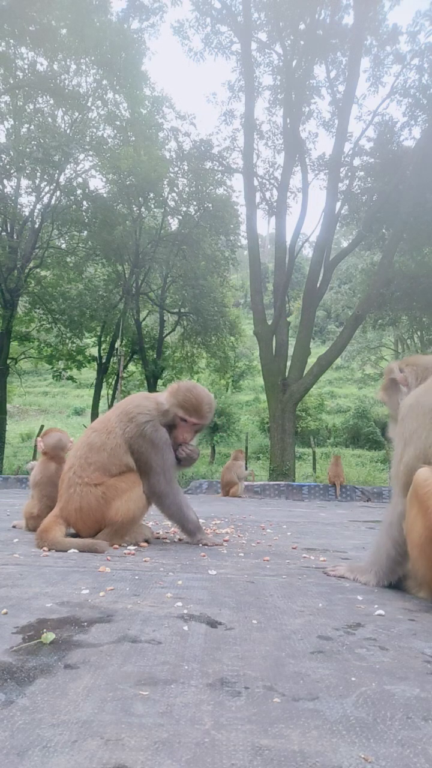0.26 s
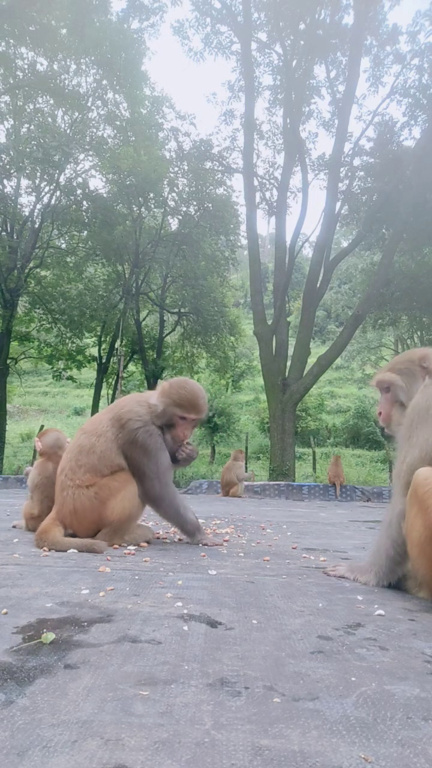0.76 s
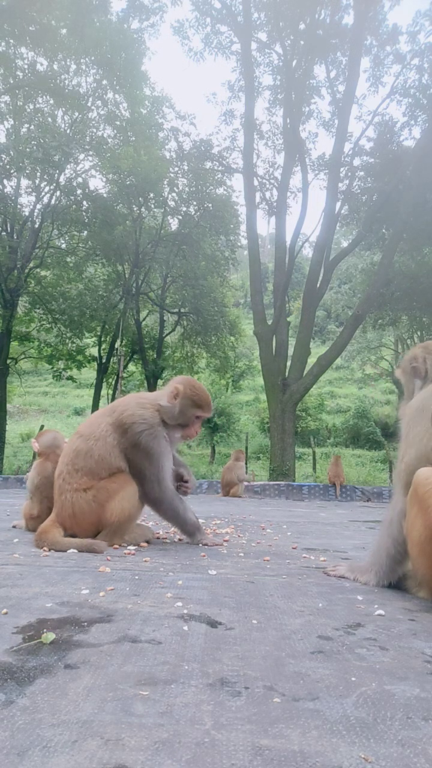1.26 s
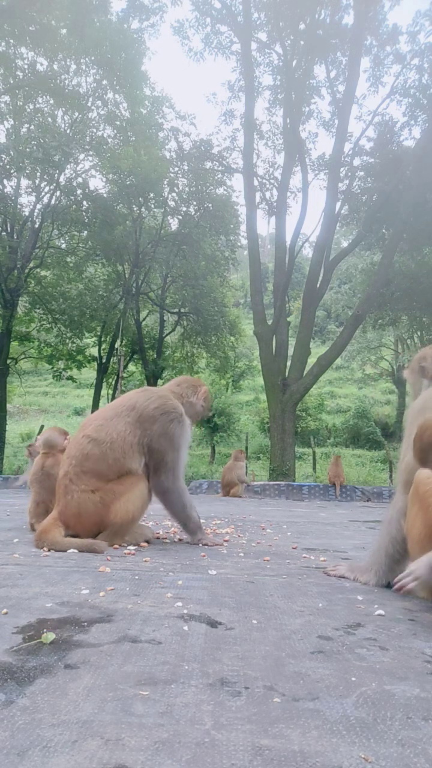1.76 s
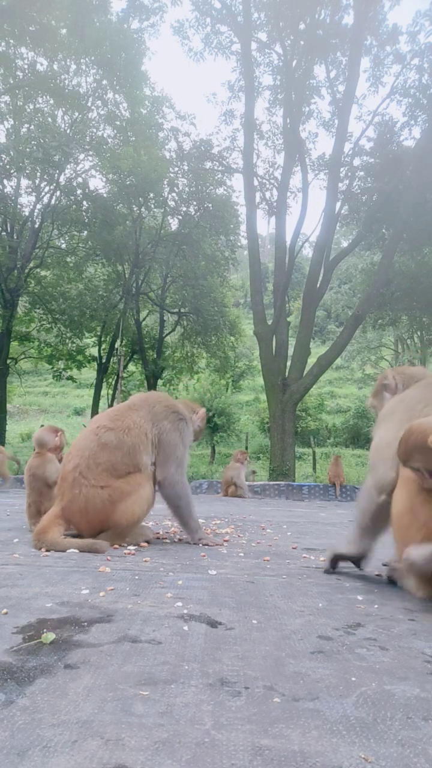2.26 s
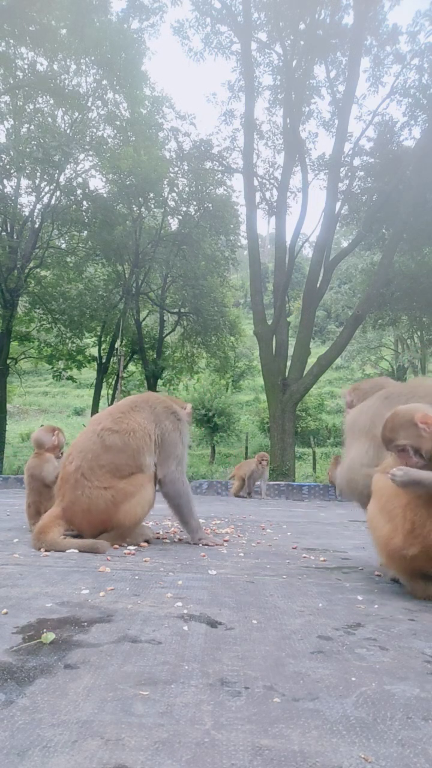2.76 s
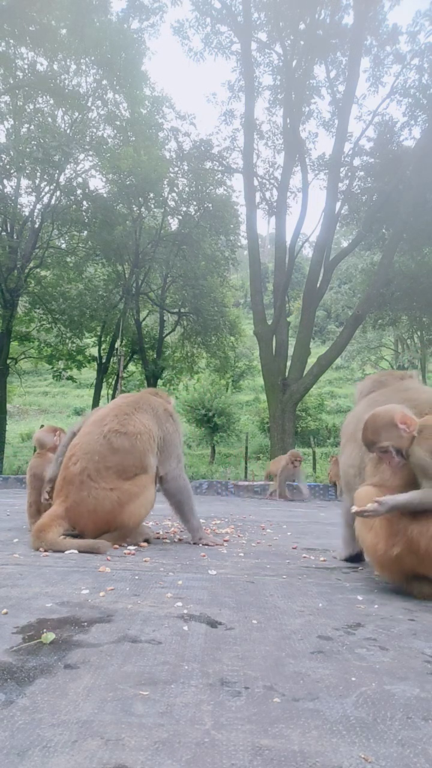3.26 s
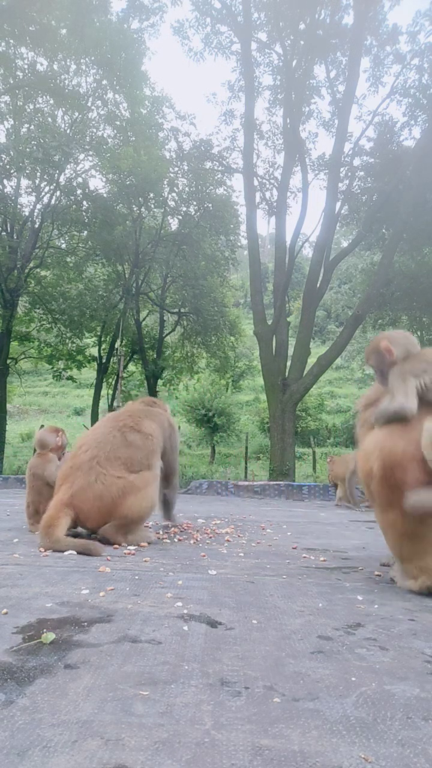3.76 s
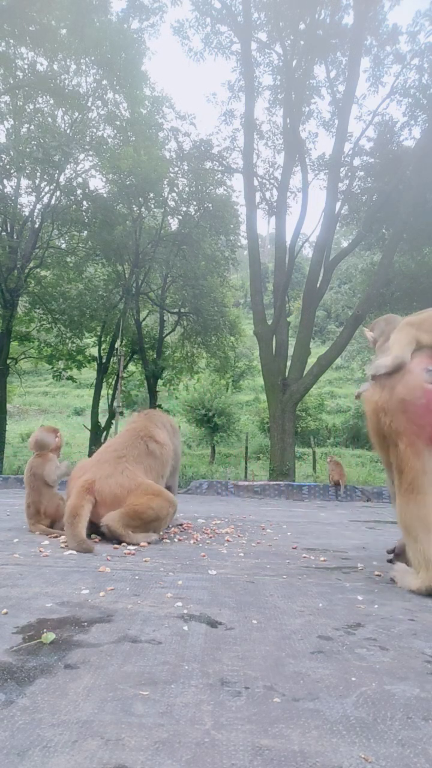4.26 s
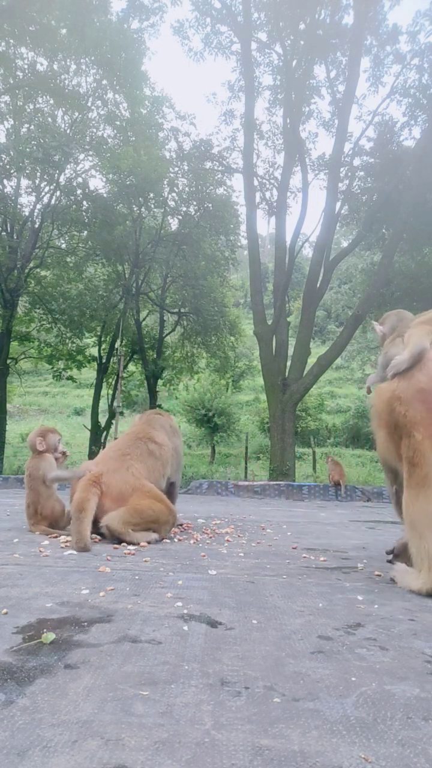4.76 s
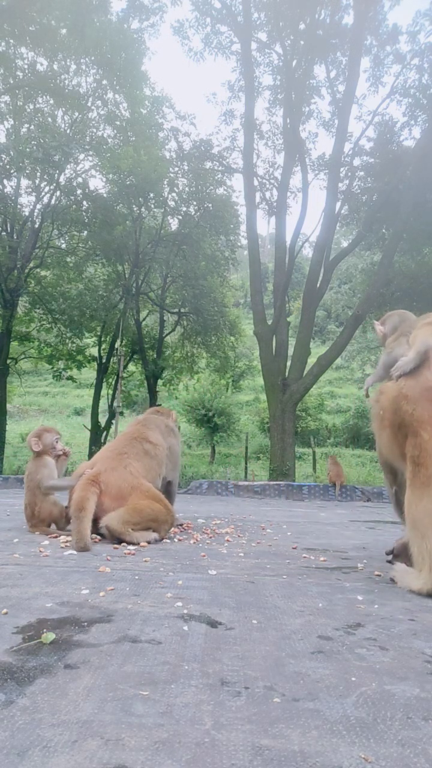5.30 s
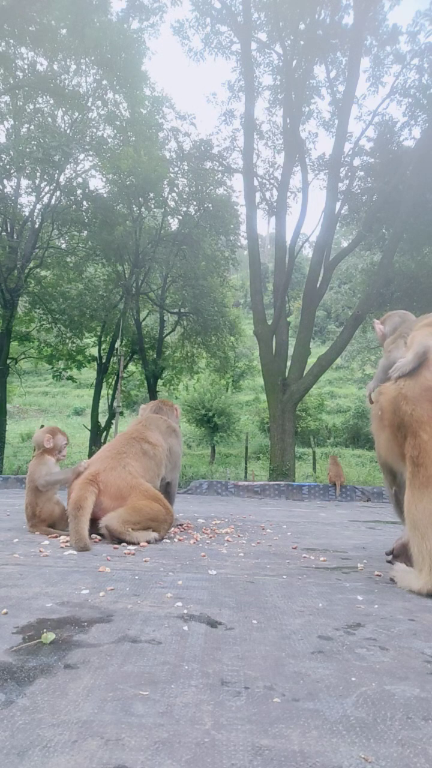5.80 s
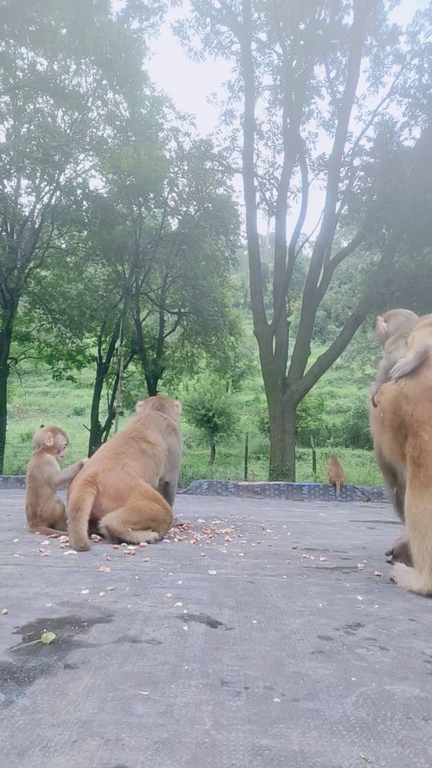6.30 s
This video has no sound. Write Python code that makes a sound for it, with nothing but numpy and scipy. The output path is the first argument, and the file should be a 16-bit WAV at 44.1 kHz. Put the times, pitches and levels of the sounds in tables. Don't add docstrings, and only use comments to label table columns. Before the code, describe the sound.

In an open wood by day, a monkey some way off hoots hoarsely, each call about 0.2 seconds, arching up to a middling pitch and sinking, with breathy rasp and soft echoes from trunks. The tail of one hoot opens the scene; a bout runs 0.4 to 1.6 seconds, another 2.2 to 3.4, a third 4.0 to 5.2, and two higher hoots come at 6.2 and 6.5. Clear coos glide quietly around 1.3 and 1.8 to 2.5. A young monkey, left of centre, squeaks sharply near 3.3 to 3.9, with a fast cluster at 3.5, and again 5.0 to 6.5, amid thin wheezes. Rough grunts come at 5.6, snorts at 6.5. Small bright ticks of nuts and grit scatter close at left; faint trilled birds whistle far away. A steady cicada whine around six to seven kilohertz and low leafy hush continue throughout.

```python
import sys
import numpy as np
from scipy import signal
from scipy.fft import rfft, irfft
from scipy.io import wavfile
from scipy.ndimage import uniform_filter1d

SR = 44100
rng = np.random.default_rng(int(sys.argv[2]) if len(sys.argv) > 2 else 0)


def dump(signal):
    limited = np.clip(np.atleast_2d(signal).T, -1, 1)
    pcm = np.round(limited * 32767).astype(np.int16)
    wavfile.write(sys.argv[1], SR, pcm)


def convert_level_to_amplitude(level_db):
    exponent = np.asarray(level_db, float) / 20
    return 10 ** exponent


N = 288414


def evened(x):
    return x / np.sqrt(np.mean(x ** 2) + 1e-20)


def read(points, hz):
    f, value = np.transpose(points)
    return np.interp(np.log(hz + 1), np.log(f + 1), value)


def coloured(x, points):
    size = x.shape[-1]
    return irfft(rfft(x) * convert_level_to_amplitude(read(points, np.fft.rfftfreq(size, 1 / SR))), size)


def played(rows):
    s, *columns = np.transpose(rows)
    t = np.arange(max(s[0], 0), s[-1], 1 / SR)
    return [t] + [np.interp(t, s, c) for c in columns]


def add(mix, s, sound):
    part = mix[..., max(round(s * SR), 0):][..., :sound.shape[-1]]
    part += sound[..., :part.shape[-1]]


def resonate(x, hz, width):
    turn = np.exp(2j * np.pi * np.cumsum(hz * np.ones(x.shape[-1])) / SR)
    r = np.exp(-np.pi * width / SR)
    return 2 * (turn * signal.lfilter([1 - r], [1, -r], x / turn + 1e-18)).real


def resonate_twice(x, hz, width, second_width):
    return resonate(resonate(x, hz, width), hz, second_width)


def drift(size, hz):
    span = max(int(SR / hz / 2), 1)
    return evened(uniform_filter1d(uniform_filter1d(rng.standard_normal(size), span), span))


def panned(x, db):
    return x * convert_level_to_amplitude(np.array([[db / 2], [-db / 2]]))


# (start [s], length [s], effort [dB], top pitch [Hz], throat re effort at mid call [dB])
HOOTS = [(-0.19, 0.21, -27, 565, -1), (0.369, 0.17, -23.5, 563, -1), (0.57, 0.2, -24, 556.6, -2.5),
         (0.791, .21, -25.5, 536.8, -2.5), (1.016, 0.2, -26, 542.7, 2), (1.235, 0.17, -25, 556.2, 0.5),
         (1.451, 0.18, -26.5, 567.7, 2), (2.192, 0.18, -24, 556.6, -1.5), (2.398, 0.18, -24, 575, -2.5),
         (2.61, .2, -24, 562.6, -4.5), (2.811, 0.21, -25.5, 546, -4.5), (3.019, .195, -24, 538.4, -2.5),
         (3.221, 0.19, -27.5, 577, 1), (4.045, .185, -25.5, 582, 0), (4.312, 0.17, -26, 588, 0.5),
         (4.534, .165, -25.5, 584, 0), (4.761, 0.17, -25.5, 573.6, 1), (5.02, 0.17, -28, 590.5, 3),
         (6.223, 0.15, -25.5, 619.5, 4), (6.489, 0.15, -22.5, 651, -7.5)]
# (frequency [Hz], level [dB per Hz])
BREATH = [(88, -70), (150, -38.5), (349, -3), (519, 12), (637, 2), (948, -19), (1190, -7.5), (1540, -46.5),
          (3200, -67), (4160, -77), (7040, -120)]
# (time [s], throat resonance [Hz], mouth resonance [Hz])
JAW = [(0, 920, 1507), (0.45, 890, 1415), (0.9, 894, 1453), (1.1, 919, 1490), (1.55, 905, 1535),
       (2.3, 938, 1490), (2.7, 891, 1487), (3.3, 922, 1542), (4.1, 1001, 1690), (4.6, 925, 1600),
       (4.85, 957, 1603), (5.1, 1023, 1760), (6.3, 983, 1590), (6.5, 1090, 1700)]


def hoot(s, length, effort_db, top_hz, open_db):
    length = length + 0.02
    t = np.arange(0, length, 1 / SR)
    u = t / length
    jaw_s, throat_curve, mouth_curve = np.transpose(JAW)
    throat_hz = np.interp(s + length / 2, jaw_s, throat_curve)
    mouth_hz = np.interp(s + length / 2, jaw_s, mouth_curve)

    rise_s, rise_db, fall_s, fall_db, sag_db, yield_db = 0.027, -6, 0.059, -7.5, -4, -2
    gape = np.sin(np.pi * u) ** 2
    throat_db = open_db - 8 * (1 - gape)
    edges_db = rise_db * np.clip(1 - t / rise_s, 0, 1) + fall_db * np.clip(1 - (length - t) / fall_s, 0, 1)
    effort_db = effort_db + edges_db + sag_db * u + yield_db * gape

    start_hz, end_hz, top_at = 434.84, 401.2, 0.43
    climb = (top_hz - start_hz) * (1 - u / top_at) ** 2
    descent = (top_hz - end_hz) * ((u - top_at) / (1 - top_at)) ** 2
    hz = top_hz - np.where(u < top_at, climb, descent)
    rough = np.clip((t - t[0]) / 0.06, 0.25, 1)
    turns = np.cumsum(hz * (1 + 0.024 * rough * drift(len(t), 60))) / SR

    fundamental = np.sin(2 * np.pi * turns) * (1 + 0.38 * rough * drift(len(t), 50))
    half = convert_level_to_amplitude(-22.5) * u * np.sin(np.pi * turns) * (1 + 0.5 * drift(len(t), 20))
    folds = np.cos(4 * np.pi * turns) + np.cos(6 * np.pi * turns)
    puffs = (0.39 + np.exp(-(turns % 1) / 0.59)) * rng.standard_normal(len(t))
    drive = 0.27 * folds + evened(puffs) * 3.7

    opening = 1 + 0.02 * drift(len(t), 12)
    throat = evened(resonate_twice(drive, throat_hz * opening, 87, 160))
    mouth = evened(resonate_twice(drive, mouth_hz * opening, 83, 250))
    rasp = evened(resonate_twice(puffs, 1.6 * mouth_hz, 380, 380))
    chest = evened(resonate_twice(rng.standard_normal(len(t)), 720, 240, 320))
    ringing = throat + convert_level_to_amplitude(-15) * mouth + convert_level_to_amplitude(-31.0) * rasp + convert_level_to_amplitude(-5) * chest

    breath = convert_level_to_amplitude(-13) * rough * evened(coloured(puffs, BREATH))
    fuzz = convert_level_to_amplitude(-7) * rough * evened(resonate_twice(rng.standard_normal(len(t)), hz, 140, 250))
    voice = evened(fundamental) + fuzz + half + convert_level_to_amplitude(throat_db) * np.sqrt(rough) * ringing + breath

    huff_db, huff_hz, huff_s = -19, 299.5, 0.011
    huff = evened(resonate(resonate_twice(puffs, huff_hz, 180, 220), huff_hz, 300))
    voice = voice + convert_level_to_amplitude(huff_db - edges_db) * t / huff_s * np.exp(1 - t / huff_s) * huff
    voice = signal.sosfilt(signal.butter(8, 2950, fs=SR, output="sos"), voice)
    return convert_level_to_amplitude(effort_db) * voice * signal.windows.tukey(len(t), 900 / len(t))


# (time [s], pitch [Hz], level [dB])
COO_A = [
    (1.25, 838, -52.5),
    (1.28, 864, -54),
    (1.37, 865, -58.5),
    (1.41, 832, -61),
]
COO_B = [
    (1.76, 1130, -55),
    (1.894, 1350, -56.5),
    (1.984, 1320, -58),
    (2.04, 1154, -54),
    (2.065, 1156, -70.5),
]
COO_D = [
    (2.065, 583, -48.5),
    (2.099, 600, -47.5),
    (2.155, 554, -51.5),
]
# (time [s], pitch [Hz], level [dB], upper overtones [dB])
COO_C = [
    (2.27, 645, -48, -16),
    (2.296, 662, -50.5, -15),
    (2.36, 590, -51.5, -5),
    (2.408, 580, -51.5, -2.5),
    (2.495, 530, -61, -2),
]
# (multiple of pitch, level [dB])
TONE_A = [(3, 5.5), (4, -7), (5, -6.5), (6, -9), (9, -10), (11, -24)]
TONE_B = [(1, 1.5), (2, -13)]
TONE_C = [(2, 5.5), (3, -2.5), (4, -18), (5, -18), (6, -11), (7, -11), (8, -9), (9, -2.5), (10, -17),
          (14, -15), (15, -17.5), (16, -17), (17, -24.5), (19, -26.5), (21, -21.5)]
TONE_D = [(1, 0.0077)]


def coo(rows, tone, trill=0.):
    t, hz, level_db, *bright_db = played(rows)
    turns = np.cumsum(hz * (1 + 0.0045 * drift(len(t), 56))) / SR
    stack = 0
    for k, db in tone:
        overtone_db = db + (k > 5.5) * sum(bright_db)
        stack = stack + convert_level_to_amplitude(overtone_db) * np.sin(2 * np.pi * round(k) * turns + k * k)
    pulsing = (1 + trill * np.sin(2 * np.pi * 40 * t)) * convert_level_to_amplitude(0.7 * drift(len(t), 50))
    pulsing = pulsing * (1 + 0.9 * trill * drift(len(t), 60))
    return t[0], np.sqrt(2) * convert_level_to_amplitude(level_db) * stack * pulsing * signal.windows.tukey(len(t), 0.2)


# (time [s], peak level [dB], pitch [Hz])
SQUEAKS = [(1.743, -47, 2780), (2.6626, -54, 2710), (3.275, -37.5, 3200), (3.4674, -43, 4140),
           (3.4844, -37, 3730), (3.4988, -35, 3305), (3.5067, -29.5, 3700), (3.515, -32, 3130),
           (3.5205, -35, 2900), (3.692, -53, 3600), (3.7114, -39.5, 3335), (3.8904, -38, 4130),
           (3.903, -41, 3380), (3.9105, -43, 3370), (5.025, -42, 2950), (5.0809, -38, 2800),
           (5.247, -30, 3060), (5.251, -34, 2920), (5.457, -41, 2880), (5.462, -37.5, 3280),
           (5.979, -40, 3070), (5.9862, -40, 4100), (6.4576, -33, 3200)]


def squeak(s, db, hz):
    t = np.arange(300) / SR
    shape = (t / 0.0011) * np.exp(1 - t / 0.00081)
    turn = 2 * np.pi * hz * t * (1 - 12 * t)
    return s, panned(convert_level_to_amplitude(db) * shape * (np.sin(turn) + convert_level_to_amplitude(-33.5) * np.sin(3 * turn)), 5.5)


# (time [s], thin hiss [dB], whistle level [dB], whistle pitch [Hz])
WHEEZES = [(3.462, -57.5, -54, 3550), (3.68, -60.5, -53.5, 3610), (3.882, -63.5, -54, 3570),
           (5.012, -66.5, -56, 2980), (5.215, -57.5, -56.5, 3120), (5.442, -60, -56, 3392),
           (5.62, -61.5, -62, 3480), (5.938, -59.5, -58, 3740), (6.45, -66, -53.5, 3000)]
# (frequency [Hz], level [dB per Hz])
THIN_HISS = [(2000, -11), (3500, -3), (5500, -9.5), (8300, -16), (9500, -16), (12000, -16.5), (15000, -16),
             (15600, -28)]


def wheeze(s, hiss_db, whistle_db, hz):
    gasp_s, hiss_rise_s, whistle_rise_s = 0.26, 0.011, 0.019
    hiss_db_per_s, whistle_db_per_s = 62, 62.5
    t = np.arange(0, gasp_s, 1 / SR)
    air = rng.standard_normal((2, len(t))) * convert_level_to_amplitude(2.5 * drift(len(t), 60))
    whistle = evened(resonate_twice(air, hz, 380, 600)) * np.minimum(t / whistle_rise_s, 1) ** 2
    grains = convert_level_to_amplitude(1.5 * drift(len(t), 300))
    hiss = evened(coloured(air * grains, THIN_HISS)) * np.minimum(t / hiss_rise_s, 1) ** 2
    both = convert_level_to_amplitude(hiss_db + 9.5 - hiss_db_per_s * t) * hiss + convert_level_to_amplitude(whistle_db - whistle_db_per_s * t) * whistle
    return s, panned(both, 6.8) * signal.windows.tukey(len(t), 600 / len(t))


# (start [s], length [s], level [dB], snort [0-1])
GRUNTS = [
    (5.604, 0.033, -44, 0),
    (5.638, 0.14, -40, 0),
    (6.452, 0.031, -44.5, 1),
    (6.491, .1, -41, 1),
]
# (frequency [Hz], level [dB per Hz])
GRUNT_TRACT = [(59, -36), (100, -23), (293, 2), (421, -9.5), (549, 2.5), (816, -9.5), (887, -6), (995, -5),
               (1280, -9.5), (1560, -18.5), (2090, -11.5), (4130, -13.5), (5200, -44), (6760, -74),
               (11400, -120)]
# (frequency [Hz], level [dB per Hz])
SNORT_TRACT = [(200, -13), (500, 6), (1500, -3), (2600, -2.5), (3100, 5), (3600, -12), (4200, 2.5),
               (4700, -19), (6000, -41)]


def grunt(s, length, level_db, snort):
    t = np.arange(0, length, 1 / SR)
    turns = np.cumsum(140 * (1 + 0.33 * drift(len(t), 83))) / SR
    puffs = (0.5 + np.exp(-(turns % 1) / 0.99)) * rng.standard_normal(len(t))
    sound = evened(coloured(puffs, SNORT_TRACT if snort > 0.5 else GRUNT_TRACT))
    level = convert_level_to_amplitude(level_db + 5.5 - 19.5 * (t / length) ** 3)
    return s, level * sound * np.minimum(t / 0.01, 1) * signal.windows.tukey(len(t), 0.08)


# (time [s], peak level [dB], pitch [Hz])
TICKS = [(0.111, -56, 13300), (1.0667, -59.5, 9700), (1.118, -55.5, 12600), (1.4007, -43, 14400),
         (1.5145, -54.5, 12340), (1.7872, -50, 14100), (2.3386, -58.5, 11300), (2.825, -52, 13130),
         (3.048, -55, 12540), (3.1393, -51.5, 12570), (3.244, -51.5, 13760), (3.466, -43.5, 11670),
         (3.6895, -54, 12530), (3.898, -46.5, 13650), (4.0724, -55.5, 13260), (4.8674, -56, 12430),
         (5.031, -57.5, 11500), (5.227, -52.5, 12050), (5.455, -63.5, 11900), (5.754, -59.5, 10000),
         (5.954, -42.5, 9500), (6.496, -63, 15260)]


def tick(s, db, hz):
    k = np.arange(800)
    grit = evened(resonate_twice(rng.standard_normal((2, 800)), hz, 2200, 3500))
    fading = np.exp(-k / 40.) + 0.25 * np.exp(-k / 300.)
    return s, panned(convert_level_to_amplitude(db - 2) * grit * fading, 7.)


# (start [s], length [s], start pitch [Hz], end pitch [Hz], level [dB])
BIRDS = [(1.76, .34, 4350, 4510, -70), (2.66, .24, 4440, 4540, -70), (4.87, .34, 4350, 4560, -69),
         (5.76, .2, 4350, 4480, -72), (1.0, .2, 3560, 3700, -67), (2.83, .19, 3520, 3660, -68),
         (4.64, .13, 3640, 3700, -68), (6.32, .13, 3580, 3700, -68)]


def bird(s, length, start_hz, end_hz, db):
    u = np.linspace(0, 1, 9)
    swell_db = -6.5 * (2 * u - 1) ** 2
    rows = np.transpose([s + length * u, start_hz + (end_hz - start_hz) * u, db + swell_db])
    return coo(rows, TONE_D, trill=0.52)


# (frequency [Hz], level [dB])
SIDE_SHARE = [(60, -11.5), (250, -19), (500, -18), (1000, -5), (2000, 4), (4000, 0), (8000, 0.5)]


def diffuse(pair):
    side = coloured(pair[1], SIDE_SHARE)
    return np.array([pair[0] + side, pair[0] - side])


# (frequency [Hz], time to fall 60 dB [s])
TREES = [(250, 0.87), (660, 0.67), (1740, 0.96), (5000, 0.32)]


def trees(x, depth):
    taps = np.zeros((2, SR))
    at = np.arange(200, SR - 20, 20) + rng.integers(0, 20, (2, (SR - 201) // 20))
    np.put_along_axis(taps, at, rng.choice([-1., 1.], at.shape), 1)
    hz, t, z = signal.stft(taps, SR, nperseg=256)
    ring_s = depth * read(TREES, hz)[:, None]
    tail = signal.istft(z * convert_level_to_amplitude(-60 * t / ring_s), SR, nperseg=256)[1]
    tail = tail / np.linalg.norm(tail[0])
    return diffuse(signal.fftconvolve(x[None], tail, axes=1)[:, :len(x)])


# (frequency [Hz], level [dB per Hz])
CICADA_BAND = [(2820, -26.5), (4800, -12.5), (4890, -6.5), (5330, -6.5), (5750, -4), (6600, 7.5), (7350, 0),
               (7790, -11), (8400, -44), (10900, -51), (18500, -120)]


def cicadas():
    clicks = rng.standard_normal((2, N)) * (rng.random((2, N)) < 0.3)
    chorus = evened(coloured(clicks, CICADA_BAND)) * convert_level_to_amplitude(0.66 * drift(N, 35))
    return panned(chorus, 0.75) * convert_level_to_amplitude(-54.6)


# (frequency [Hz], level [dB per Hz])
HUSH = [(30, -35), (70, -10), (110, -2), (250, -1), (500, -2), (1000, -10), (2000, -25), (4000, -24.5),
        (5500, -36), (8300, -33), (9500, -37), (13000, -37), (15300, -35), (15700, -81)]


def hush():
    hz, t, z = signal.stft(rng.standard_normal((2, N)), SR, nperseg=1024)
    patches = uniform_filter1d(rng.standard_normal(z.shape[1:]), 14, 0)
    patches = evened(uniform_filter1d(patches, 8, 1))
    flicker = evened(uniform_filter1d(rng.standard_normal(len(t)), 3, 0))
    rustle = flicker * np.clip(hz[:, None] / 9000 - 0.5, 0, 1)
    field_db = 1.6 * patches + 2.2 * rustle
    air = signal.istft(z * convert_level_to_amplitude(field_db), SR, nperseg=1024)[1][:, :N]
    pair = diffuse(evened(coloured(air, HUSH)))
    left = coloured(pair[0], [(100, 0.5), (15000, 11.7)])
    right = coloured(pair[1], [(100, 0.5), (15000, 6.9)])
    return convert_level_to_amplitude(-58) * np.array([left, right])


def scene():
    lead_s = 0.5
    lead = round(lead_s * SR)
    far, others, birds, near = np.zeros(lead + N), np.zeros(N), np.zeros(N), np.zeros((2, N))
    for s, *row in HOOTS:
        add(far, lead_s + s, hoot(s, *row))
    for rows, tone in ((COO_A, TONE_A), (COO_B, TONE_B), (COO_C, TONE_C), (COO_D, TONE_D)):
        add(others, *coo(rows, tone))
    for mix, source, table in ((birds, bird, BIRDS), (others, grunt, GRUNTS), (near, wheeze, WHEEZES),
                               (near, squeak, SQUEAKS), (near, tick, TICKS)):
        for row in table:
            add(mix, *source(*row))
    rest = np.pad(convert_level_to_amplitude(-14) * others + convert_level_to_amplitude(-10.0) * near.mean(0) + convert_level_to_amplitude(-3) * birds, (lead, 0))
    echoes = trees(convert_level_to_amplitude(-8) * far + rest, 1.274)
    echoes += trees(convert_level_to_amplitude(-10) * far, 0.12)
    callers = (panned(far, 1.2) + echoes)[:, lead:]
    return callers + panned(others, 2.4) + convert_level_to_amplitude(0.5) * birds + near + cicadas() + hush()


def band_limit(x):
    return signal.sosfilt(signal.butter(12, 15550, fs=SR, output="sos"), x)


def record(dry):
    return band_limit(dry)


dry = scene()
out = record(dry)
dump(out)
```